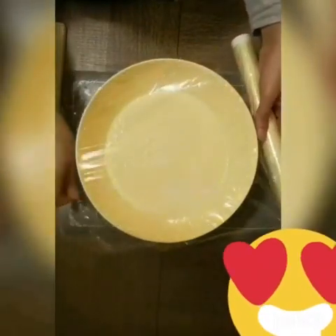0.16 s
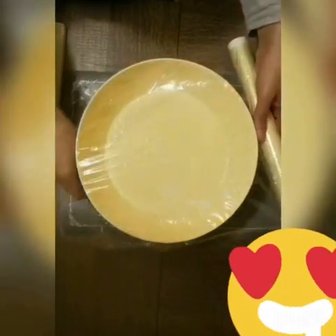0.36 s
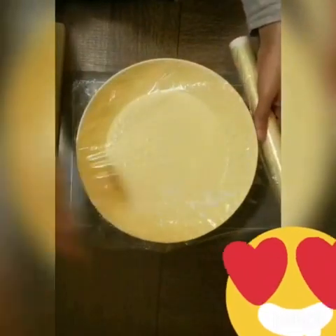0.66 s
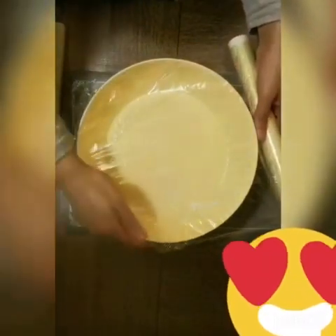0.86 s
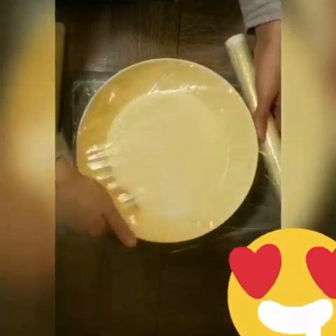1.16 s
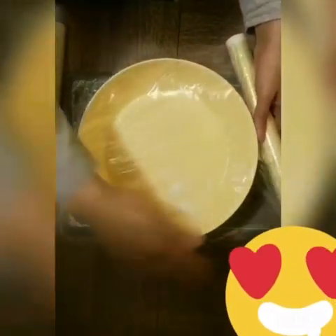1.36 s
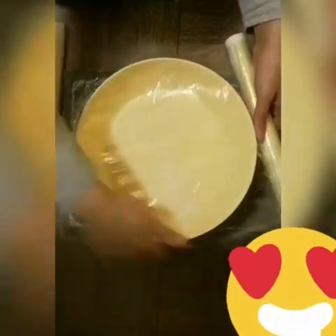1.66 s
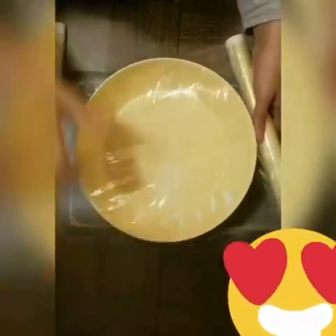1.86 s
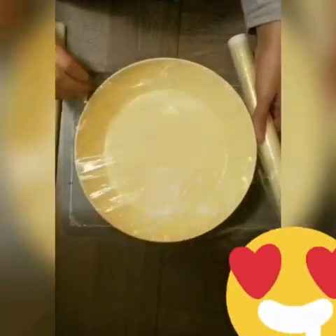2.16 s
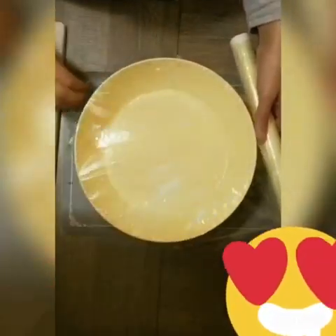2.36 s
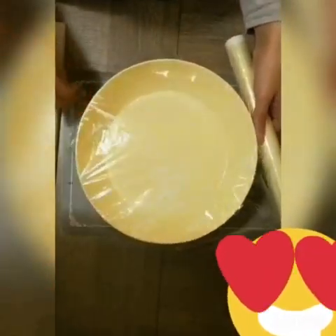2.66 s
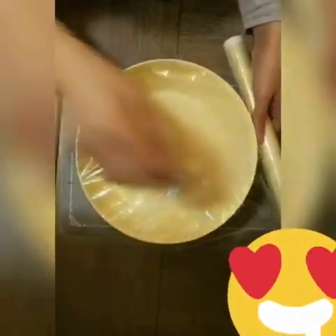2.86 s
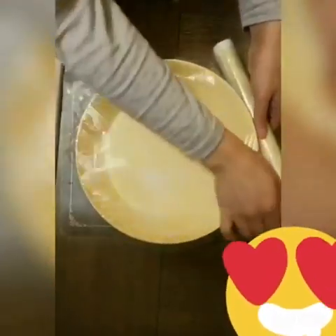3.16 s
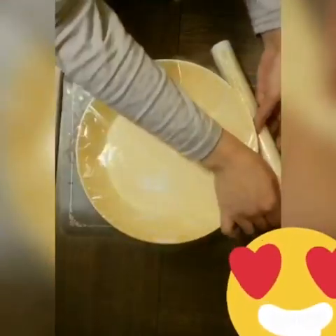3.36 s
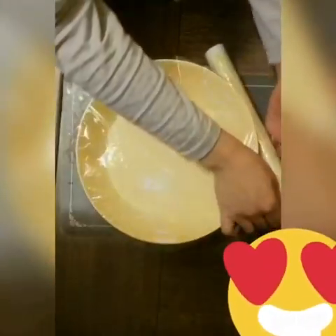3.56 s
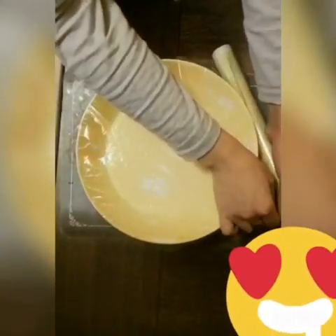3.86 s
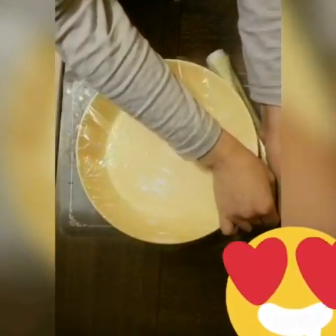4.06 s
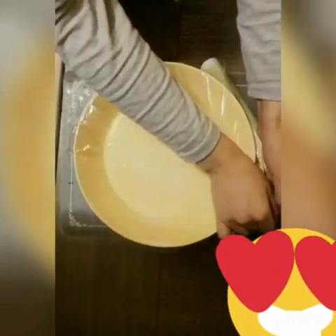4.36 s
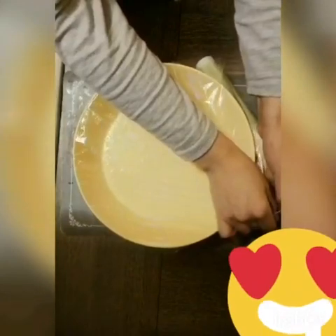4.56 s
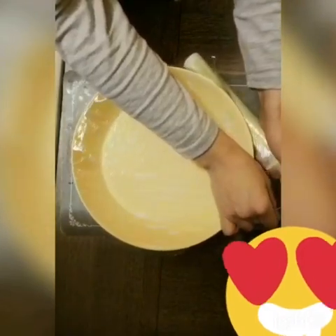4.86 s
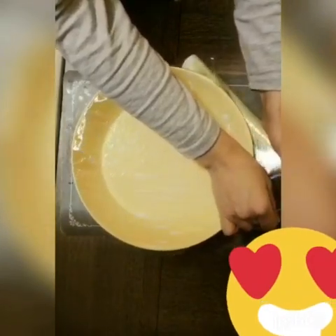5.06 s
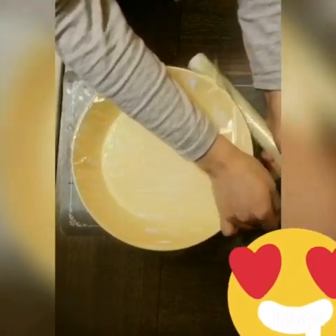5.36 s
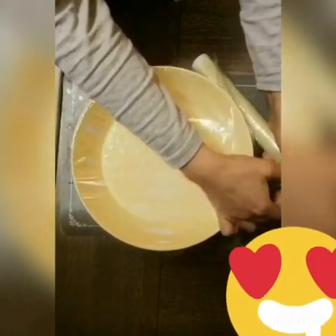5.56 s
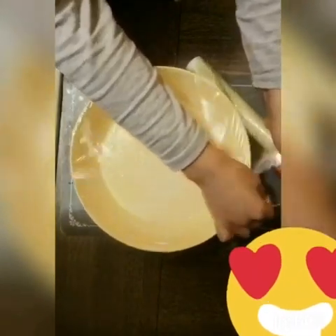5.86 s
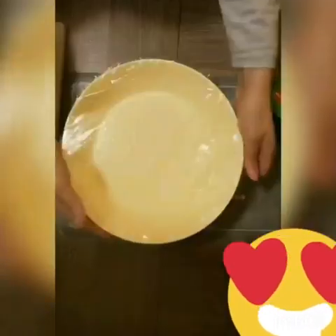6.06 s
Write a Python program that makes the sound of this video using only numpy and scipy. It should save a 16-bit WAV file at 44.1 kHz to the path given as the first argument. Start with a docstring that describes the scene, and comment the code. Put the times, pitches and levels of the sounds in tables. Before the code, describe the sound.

Hands press and pull thin plastic film on a bowl. At first it only rustles delicately with little squeaks, then crackles burst out in uneven clumps, with hollow snaps and short woody table thumps. Activity peaks in the middle, thins out, and ends on a sharp crackling snap and low rumble. Intimate stereo pickup, short room echoes, soft steady hiss.

```python
"""Cling film over a bowl

Cling film is stretched over a wide bowl on a wooden table and pulled off its roll, in a small kitchen.
The film crackles in dense random clicks, lets go in snaps (short noise bursts) and squeaks in gliding notes.
Hands, bowl and roll thump the table, which rings in dying sines and rumbles under filtered noise.
Two microphones a hand apart hear it, the left one first, with random echoes and a faint coloured hiss."""
import sys
import numpy as np
from scipy import signal
from scipy.fft import rfft, irfft, next_fast_len
from scipy.io import wavfile

SR = 44100
rng = np.random.default_rng(int(sys.argv[2]) if len(sys.argv) > 2 else 0)


def master_out(mix):
    """Clip the mix to full scale and print it as 16-bit PCM to the path in sys.argv[1]."""
    frames = np.transpose(np.atleast_2d(mix))
    ceiling = np.clip(frames, -1, 1)
    pcm = np.round(ceiling * 32767).astype(np.int16)
    wavfile.write(sys.argv[1], SR, pcm)


N = 274302   # length in samples

# Colour of the faint hiss. Each row: frequency in Hz, relative level in dB per Hz.
HISS_COLOUR = [(30, 5.5), (53, -41), (215, -31), (273, -20), (569, -48), (889, -24), (2230, -19),
               (3220, -25.5), (16000, -36.5)]
# The hands move about before the microphones.
# Each row: time in seconds, dB up on the left and down on the right, delay of the right side in ms.
HAND_PLACE = [(0, .4, .68), (3.3, .3, .68), (3.5, 1.1, .68), (4.45, 1.1, .68), (4.55, 1.3, .5),
              (5.5, 1.2, .5), (5.97, .5, .5), (6.05, .4, .68)]

# Arms and bowl leaning on the table. Each row: time in seconds, rumble level in dB.
LEANING = [(0.0, -61), (0.81, -69), (0.99, -60.5), (2.23, -70.5), (2.48, -59), (2.86, -70.5), (3.2, -70.5),
           (3.43, -51.5), (4.21, -68.5), (4.49, -44), (4.8, -58), (5.82, -70), (6.22, -44.5)]
# Thumps on the table. Each row: start in seconds, level in dB before a small random change per mode,
# deep modes in dB relative to that, bowl modes in dB relative to that.
TABLE_THUMPS = [(0.882, -45.5, 5, -12), (0.928, -50, 4, -16), (1.616, -39, -2, -15), (1.642, -40, -19, -5),
                (2.28, -48, 2.5, -10), (2.367, -37, -3, -4), (2.424, -21, -17, -7.5),
                (2.507, -35.5, -7.5, -37), (2.627, -41.5, -10, -15), (3.221, -38.5, -10.5, -7),
                (3.298, -13.5, -16, -8.5), (3.583, -22.5, -14.5, -30), (4.293, -28, -5.5, -3),
                (4.313, -33.5, -5, 3.5), (4.367, -34.5, -9, -16), (4.497, -29, -10.5, -9),
                (4.618, -43, -1.5, -31), (5.037, -50, -26, -4), (5.191, -63.5, -14, 13),
                (5.232, -59, -28, 16.5), (5.408, -48.5, -6, 2), (5.513, -51, -4, -28),
                (5.693, -63.5, -7, 18.5), (5.945, -39, 4, 10), (6.058, -27.5, -2, -7.5)]
# Ways the table and bowl ring when thumped.
# Each row: frequency in Hz, level in dB, time to die by 60 dB in seconds.
DEEP_TABLE_MODES = [(62.5, 2.5, 0.37), (80.8, -1, 0.45), (100.2, 10, 0.11), (129, -3, 0.23)]
TABLE_TOP_MODES = [(149, -15, 0.42), (173, -2, 0.24), (210, -15, 0.1), (240, -10, 0.08)]
BOWL_MODES = [(300, -37, 0.063), (363, -4, 0.03), (395.5, -6, 0.073), (669, -7.5, 0.061), (943, -12, 0.094)]

# Fingers slipping on taut film. Each row: start in seconds, length in seconds, starting pitch in Hz, level in dB.
FINGER_SQUEAKS = [(0.186, 0.104, 2780, -61.5), (0.306, 0.015, 2800, -52), (0.339, 0.0094, 2800, -53),
                  (0.401, 0.011, 2750, -55), (0.432, 0.013, 2750, -51.5), (1.14, 0.066, 2060, -51.5),
                  (1.21, 0.035, 2050, -54), (3.268, 0.026, 1830, -43), (4.555, 0.009, 2450, -46),
                  (4.572, 0.029, 2150, -37)]
# The film lets go. Each row: start in seconds, level in dB, bright part in dB relative to that,
# dull part in dB relative to that, time to die by 60 dB in seconds, pitch of the taut patch in Hz.
FILM_SNAPS = [(0.1656, -50, 0, 5, 0.028, 1500), (0.501, -34.5, -22, 0.5, 0.012, 1970),
              (1.478, -57, -6, -1, 0.035, 2310), (2.309, -34, 8.5, 8, 0.0095, 2420),
              (3.2012, -48, -25, 0.5, 0.05, 2800), (3.2306, -29.5, -23, -3, 0.022, 1890),
              (3.4304, -40, 1.5, 10.5, 0.016, 1950), (3.5677, -18, -29, -3, 0.012, 2000),
              (3.956, -52.5, -1, -8.5, 0.14, 2700), (4.189, -63.5, 16, -8, 0.0095, 2000),
              (4.2321, -38, -3, 1.5, 0.017, 1800), (4.2949, -21.5, 1, -30, 0.016, 1860),
              (4.313, -22.5, 0, 0, 0.018, 1920), (4.6462, -16, -20, -22, 0.0046, 1910),
              (4.67, -22, -11, -7, 0.0095, 1680), (4.6845, -32, -20, -10, 0.008, 1910),
              (4.6927, -25.5, -26, -5, 0.015, 1840), (4.799, -46.5, -4, 1, 0.03, 2540),
              (4.966, -58.5, -2, 10, 0.019, 1760), (4.992, -52, -20, 3, 0.025, 2760),
              (5.0371, -32, -25, 10.5, 0.0068, 2030), (5.2322, -39, -31, -1.5, 0.016, 2280),
              (5.3974, -33.5, -16, -3, 0.017, 1770), (5.856, -65, -5, -12, 0.016, 2030),
              (5.946, -13, -3, -5, 0.022, 2460)]
# Each crinkle swells to a peak and fades. Each row: peak time in seconds, bright creasing level in dB,
# swell time in seconds, fade time in seconds, slackness in dB.
FILM_CRINKLES = [(0.015, -59, 0.32, 0.73, -2.5), (0.176, -54.5, 0.31, 0.26, 0),
                 (0.317, -60.5, 0.41, 0.12, -4), (0.418, -59.5, 0.13, 0.33, -2.5),
                 (0.496, -61, 0.1, 0.17, 2.5), (0.879, -55.5, 0.13, 0.22, 0.5),
                 (0.942, -56.5, 0.058, 0.099, 0.5), (1.173, -57, 1, 0.44, -1.5),
                 (1.49, -62.5, 0.059, 0.51, 0.5), (1.705, -64.5, 0.95, 0.19, 2),
                 (2.243, -57, 0.16, 0.31, 0), (2.308, -37, 0.089, 0.043, -2),
                 (2.382, -41.5, 0.16, 0.18, 0.5), (2.655, -53, 0.28, 0.077, -0.5),
                 (3.159, -64.5, 0.019, 0.042, -17), (3.235, -44.5, 0.1, 0.05, 1.5),
                 (3.286, -52, 0.22, 0.17, 2.5), (3.433, -52.5, 0.68, 0.13, -0.5),
                 (3.562, -51.5, 0.11, 0.3, 2.5), (3.813, -56.5, 0.065, 0.37, -3),
                 (4.242, -53.5, 0.11, 0.014, 1), (4.3, -29.5, 0.064, 0.08, -2),
                 (4.359, -37, 0.25, 0.18, -2), (4.512, -51.5, 0.39, 0.32, -1),
                 (4.583, -47.5, 0.22, 0.22, -2.5), (4.658, -43, 0.16, 0.3, -2),
                 (4.801, -57, 0.058, 0.08, 4), (5.04, -55, 0.19, 0.11, 1), (5.227, -57.5, 0.016, 0.12, 0),
                 (5.409, -51.5, 0.19, 0.5, -1), (5.516, -47, 0.071, 0.088, -4.5),
                 (5.73, -60.5, 0.088, 0.084, 3), (5.868, -51, 0.094, 0.052, -3),
                 (5.947, -28.5, 0.032, 0.12, 1.5), (6.02, -47, 0.26, 0.25, 1.5),
                 (6.21, -45.5, 0.39, 0.11, 0)]
# Resonances of film over the bowl, then of slack film. Each row: frequency in Hz, width in Hz, relative level in dB.
HOLLOW_PEAKS = [(1230, 890, -3.5), (1604, 1256, 10.5), (1996, 650, 12.5), (2934, 350, 8)]
FLAP_PEAKS = [(257, 263, 1), (498, 180, 5.5), (597, 180, 5.5), (990, 415, -2.5)]
# Colour of the bright creasing. Each row: frequency in Hz, relative level in dB per Hz.
BRIGHT_COLOUR = [(1760, -13), (3000, 2.5), (3360, -0.5), (5920, -2.5), (8640, -6.5), (10400, -3),
                 (13200, -9.5), (15200, -7), (16000, -31)]
# Level of the top treble of the bright film sound. Each row: time in seconds, level change in dB.
TOP_TREBLE = [(0, -2), (3.3, 0), (3.6, -13), (3.85, -16), (3.95, 1), (4.3, -2), (6.22, -1)]

HISS_DB = -60.5
KITCHEN_T60_S, KITCHEN_DB = 0.15, 2.5   # T60: time to die by 60 dB
NEAR_T60_S, NEAR_DB = 0.025, 1   # echoes off table and bowl
ALIKE_BELOW_HZ = 404
CLOSE_ECHO_DB = -5   # taut patches sound close and dry
STILLED_S = 6.118   # the last thump stops short
SQUEAK_SAG = 0.04   # share of the pitch lost as the finger slows
FINEST_DB = -5   # finest hiss of a snap, below its bright part
CREASES_PER_S, CREASE_SPREAD_DB = 11000, 3.5
RESTING_DB = -82.5   # the film creeps a little even when left alone
FLAP_DB, FLAP_FOLLOWS = -3.5, 2.27   # slackness lifts the hollow ring, and the dull flap still more
SWELL_POWER, FADE_POWER = 4.51, 3.33   # sharpness of the peak on either side
TOP_FROM_HZ, CUTOFF_HZ = 10200, 15800


def from_db(db):
    """Turn decibels into a gain."""
    return 10 ** (np.asarray(db) / 20)


def rms_one(x):
    """Scale to an average strength (rms) of one."""
    return x / np.sqrt(np.mean(x ** 2) + 1e-20)


def in_time(rows):
    """Draw straight lines between the rows of a table, giving one value a sample for each column."""
    s, *columns = np.transpose(rows)
    return [np.interp(np.arange(N) / SR, s, column) for column in columns]


def add(out, s, sound):
    """Mix a sound in from second s on."""
    part = out[..., round(s * SR):][..., :sound.shape[-1]]
    part += sound[..., :part.shape[-1]]


def highpass(x, hz):
    """Weaken everything below a frequency."""
    return signal.sosfilt(signal.butter(2, hz, "high", fs=SR, output="sos"), x)


def coloured(x, spectrum):
    """Shape by a spectrum so that white noise keeps its power."""
    size = next_fast_len(N)
    hz, db = np.transpose(spectrum)
    bins_hz = np.arange(size // 2 + 1) * SR / size
    gain = from_db(np.interp(np.log(bins_hz + 1), np.log(hz), db))
    return irfft(rfft(x, size) * rms_one(gain), size)[..., :N]


def resonant(x, peaks):
    """Resonances side by side, scaled so that white noise keeps its power."""
    out = 0
    click = np.arange(len(x)) == 0   # its response tells how much to scale
    both = np.stack([x, click]) + 1e-18
    for k, (hz, width_hz, db) in enumerate(peaks):
        r = np.exp(-np.pi * width_hz / SR)
        poles = [1, -2 * r * np.cos(2 * np.pi * hz / SR), r * r]
        peak = signal.lfilter([1 - r * r, 0, r * r - 1], poles, both)
        out = out + (-1) ** k * from_db(db) * peak
    return out[0] / np.sqrt(np.sum(out[1] ** 2))


def ring(clicks, hz, t60):
    """A unit click sets a sine of height 1 ringing and dying away."""
    r, w = from_db(-60 / (t60 * SR)), 2 * np.pi * hz / SR
    return signal.lfilter([0, np.sin(w)], [1, -2 * r * np.cos(w), r * r], clicks + 1e-18)


def struck(modes):
    """Half a second of ringing after a unit click; all modes start together."""
    click = 1. * (np.arange(SR // 2) == 0)
    return np.array([from_db(db) * ring(click, hz, t60) for hz, db, t60 in modes])


def pushed(ringing, push_s):
    """A soft push sets modes ringing more gently than a click; a longer push is softer."""
    push = signal.windows.hann(round(push_s * SR))
    return signal.lfilter(push / push.sum(), 1, ringing)


def hiss():
    """Faint coloured noise, different on each side."""
    return from_db(HISS_DB) * coloured(rng.standard_normal((2, N)), HISS_COLOUR)


def kitchen(x):
    """Dense dying echoes, each side its own, renewed as the hands move; long waves reach both sides alike."""
    hop, after, out = SR // 60, np.arange(SR // 5) / SR, np.zeros((2, N))
    near, far = [rms_one(from_db(-60 * after / t60)) for t60 in (NEAR_T60_S, KITCHEN_T60_S)]
    dying = np.hypot(from_db(NEAR_DB) * near, from_db(KITCHEN_DB) * far) / np.sqrt(len(after))
    fade = np.sin(np.pi * np.arange(2 * hop) / (2 * hop))
    padded = np.concatenate([x, np.zeros(2 * hop)])
    # overlapping pieces of sound, sixty a second, each get fresh random echoes
    for at in range(0, N, hop):
        echoes = rng.standard_normal((2, len(after))) * dying
        piece = padded[at:at + 2 * hop] * fade
        add(out, at / SR, signal.fftconvolve(piece[None], echoes, axes=1))
    return highpass(out, ALIKE_BELOW_HZ)   # leaves long waves to the direct sound


def rumble():
    """Arms and bowl leaning on the table shake its low modes; each dies twice as fast as after a thump."""
    shaking = rng.standard_normal(N)
    low_modes = DEEP_TABLE_MODES + TABLE_TOP_MODES[:2]
    shaken = sum(from_db(db) * ring(shaking, hz, t60 / 2) for hz, db, t60 in low_modes)
    return from_db(in_time(LEANING)[0]) * rms_one(shaken)


def thumps():
    """Each thump rings table and bowl, every mode with its own strength; low modes get a longer, softer push."""
    out = np.zeros(N)
    # neighbouring deep modes start in opposite directions
    deep = pushed(struck(DEEP_TABLE_MODES) * [[1], [-1], [1], [-1]], 0.0092)
    top = pushed(struck(TABLE_TOP_MODES), 0.0046)
    bowl = pushed(struck(BOWL_MODES), 0.001)
    modes = np.vstack([deep, top, bowl])
    sizes = [len(deep), len(top), len(bowl)]
    chance_db = rng.normal(0, 1.2, (len(TABLE_THUMPS), len(modes)))
    # after the first touch the hand settles unevenly
    after = np.arange(SR // 10) / SR
    settling = rng.standard_normal((len(TABLE_THUMPS), len(after))) * from_db(-40 - 60 * after / 0.26)
    settling[:, 0] = 1
    for (s, db, deep_db, bowl_db), spread_db, contact in zip(TABLE_THUMPS, chance_db, settling):
        strengths = from_db(db + np.repeat([deep_db, 0, bowl_db], sizes) + spread_db)
        add(out, s, signal.fftconvolve(strengths @ modes, contact))
    out *= from_db(-60 * np.maximum(np.arange(N) / SR - STILLED_S, 0) / 0.02)
    return highpass(out, 75)   # the table radiates little below its lowest modes


def squeaks():
    """Quick stick-slip on a taut patch: a narrow, fluttering note that swells, sags and fades."""
    out = np.zeros(N)
    noise = rng.standard_normal((len(FINGER_SQUEAKS), SR // 5))
    for (s, length_s, hz, db), rubbing in zip(FINGER_SQUEAKS, noise):
        along = np.clip(np.arange(len(rubbing)) / SR / length_s, 0, 1)
        pitch_hz = hz * (1 - SQUEAK_SAG * along)
        note = np.sin(2 * np.pi * np.cumsum(pitch_hz) / SR)
        flutter = 1 + 0.59 * rms_one(resonant(rubbing, [(160, 380, 0)]))
        swell = np.sqrt(np.abs(np.sin(np.pi * along)))
        add(out, s, from_db(db) * swell * flutter * note)
    return out


def snaps():
    """Each snap is a quick flurry of creases that dies away; it also rings the taut patch that lets go."""
    drive, patches, after = np.zeros((4, N)), np.zeros(N), np.arange(SR // 5) / SR
    noise = np.clip(rng.laplace(0, 0.7, (len(FILM_SNAPS), len(after))), -2.5, 2.5)
    for (s, db, bright_db, dull_db, dying_s, hz), crackle in zip(FILM_SNAPS, noise):
        shape = (1 - np.exp(-after / 0.0011)) * from_db(-60 * after / max(dying_s, 0.004))
        strength = np.linalg.norm(shape)
        flurry = shape * crackle
        flurry *= strength / np.linalg.norm(flurry)
        # bright, hollow, dull and finest parts
        parts_db = np.array([[bright_db], [-4], [dull_db], [bright_db + FINEST_DB]])
        add(drive, s, from_db(db + parts_db) * flurry)
        taut = [(hz, 480, 0)]
        patch = resonant(resonant(flurry, taut), taut)
        add(patches, s, from_db(db + 4.5) * patch * strength / np.linalg.norm(patch))
    finest = resonant(drive[3], [(12300, 5700, 0)])
    return drive[:3], patches + finest


def creases():
    """Tiny clicks at random moments, a few much larger than the rest; average strength one."""
    sizes = from_db(CREASE_SPREAD_DB * np.minimum(rng.exponential(1, N), 5))
    directions = rng.choice([-1, 1], N)
    happens = rng.random(N) < CREASES_PER_S / SR
    return rms_one(sizes * directions * happens)


def crinkling():
    """Gains of the bright, hollow and dull creasing: the crinkles add up in power over a faint rest."""
    t, power = np.arange(N) / SR, from_db(2 * RESTING_DB) * np.ones((3, N))
    for s, db, swell_s, fade_s, slack_db in FILM_CRINKLES:
        swell = np.clip(1 - (s - t) / swell_s, 0, 1) ** SWELL_POWER
        fade = np.clip(1 - (t - s) / fade_s, 0, 1) ** FADE_POWER
        shape = swell * fade
        heard = shape > 0
        gains = from_db(db + np.array([[0], [slack_db], [FLAP_DB + FLAP_FOLLOWS * slack_db]]))
        power[:, heard] += (gains * shape[heard]) ** 2
    return np.sqrt(power)


def film():
    """The same creases sound in three ways: bright, through the hollow of the bowl, and as a dull flap."""
    sudden, patches = snaps()
    bright, hollow, dull = crinkling() * creases() + sudden
    bright = coloured(bright, BRIGHT_COLOUR)
    lower = signal.sosfiltfilt(signal.butter(2, TOP_FROM_HZ, fs=SR, output="sos"), bright)
    bright = lower + from_db(in_time(TOP_TREBLE)[0]) * (bright - lower)
    return bright + resonant(hollow, HOLLOW_PEAKS) + resonant(dull, FLAP_PEAKS), patches


def scene():
    """Direct sound reaches the left microphone first; echoes and hiss are added."""
    left_db, late_ms = in_time(HAND_PLACE)
    wide, patches = film()
    wide = wide + thumps() + rumble()
    close = patches + squeaks()
    direct = wide + close
    late_at = np.round(np.arange(N) - late_ms * SR / 1000).astype(int)
    heard = np.stack([direct, direct[np.maximum(late_at, 0)]])
    heard = heard + kitchen(wide + from_db(CLOSE_ECHO_DB) * close)
    return heard * from_db(left_db * np.array([[1], [-1]])) + hiss()


def record(dry):
    """Small microphones lose the deepest bass; the top is cut steeply."""
    thin = highpass(dry, 40)
    return signal.sosfilt(signal.cheby2(14, 70, CUTOFF_HZ, fs=SR, output="sos"), thin)


dry = scene()
out = record(dry)
master_out(out)
```